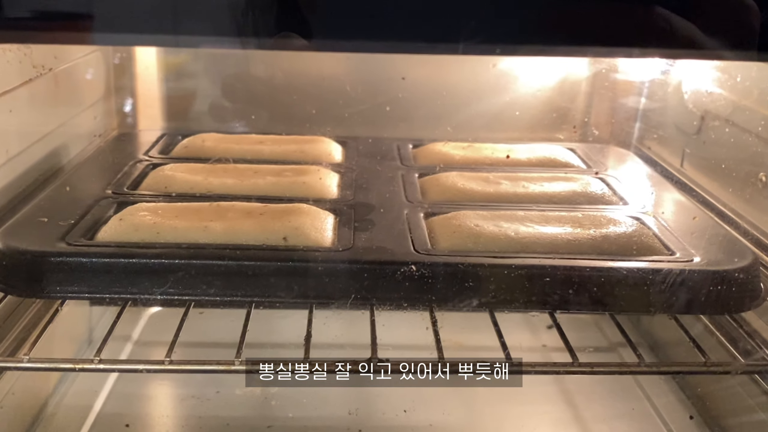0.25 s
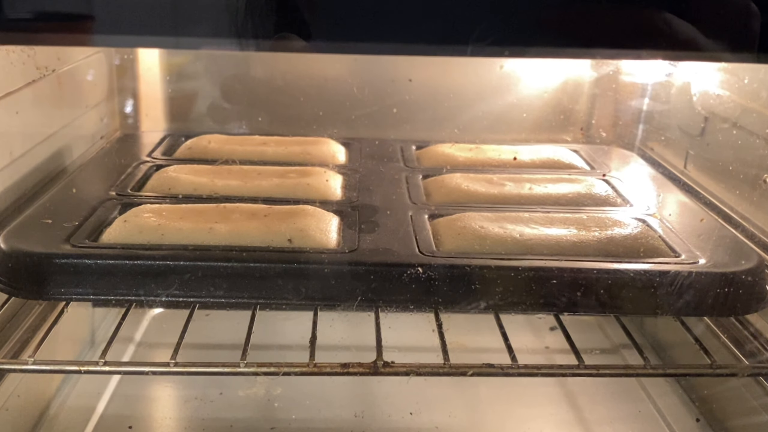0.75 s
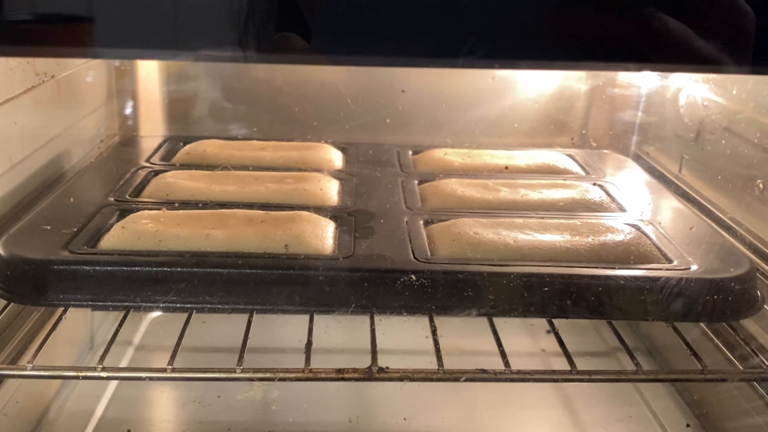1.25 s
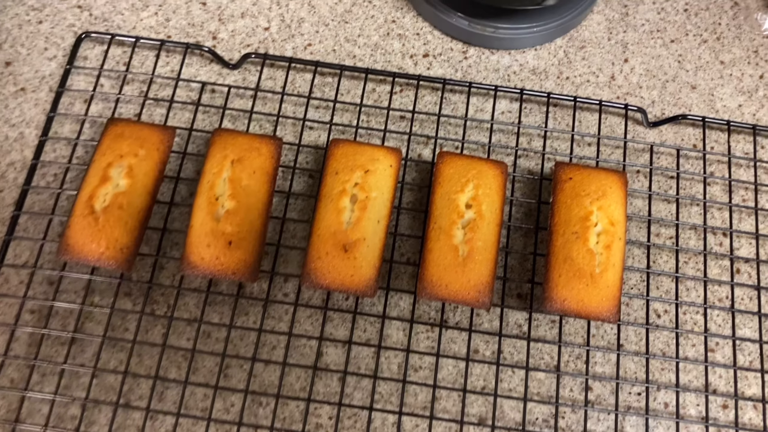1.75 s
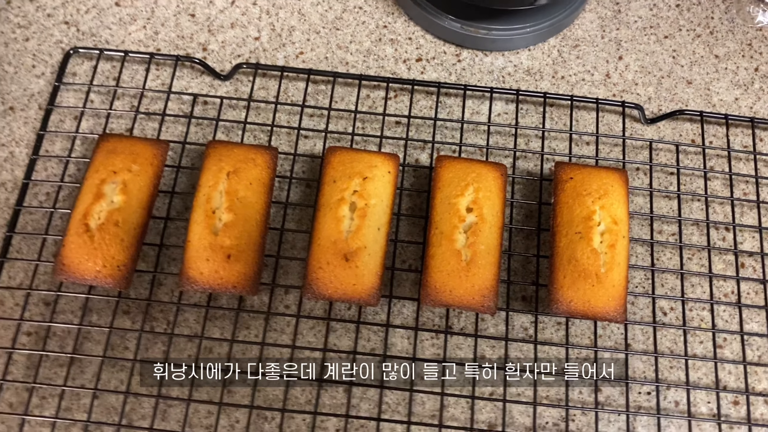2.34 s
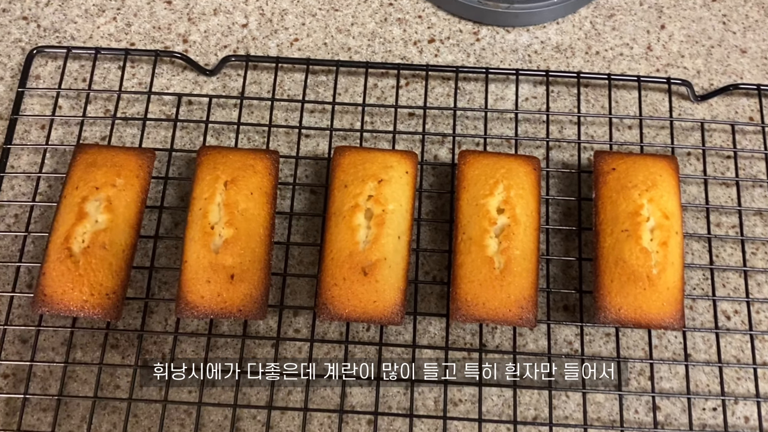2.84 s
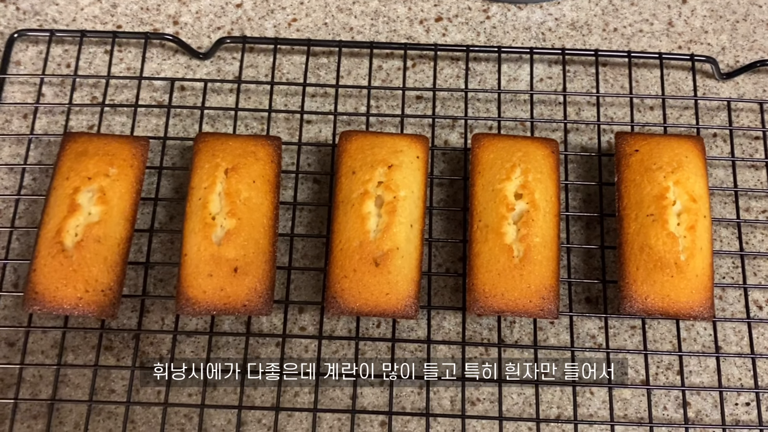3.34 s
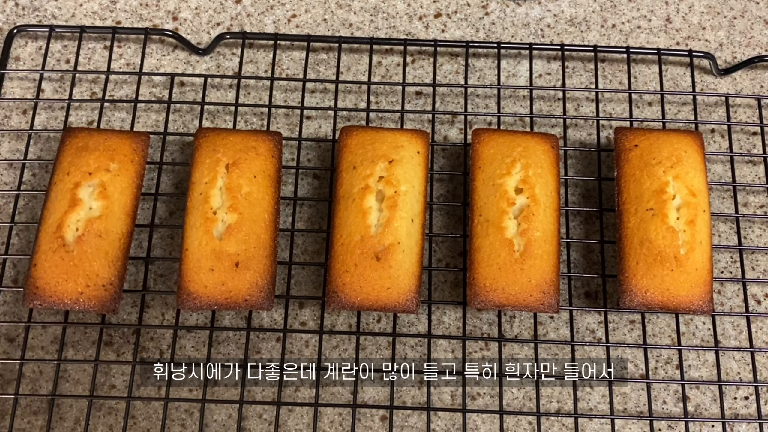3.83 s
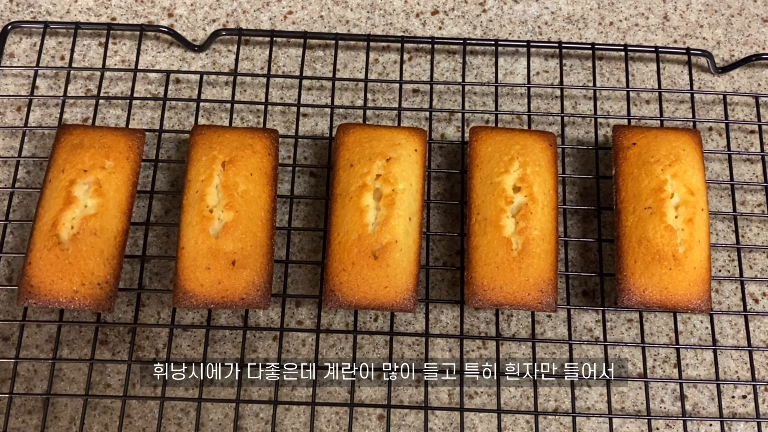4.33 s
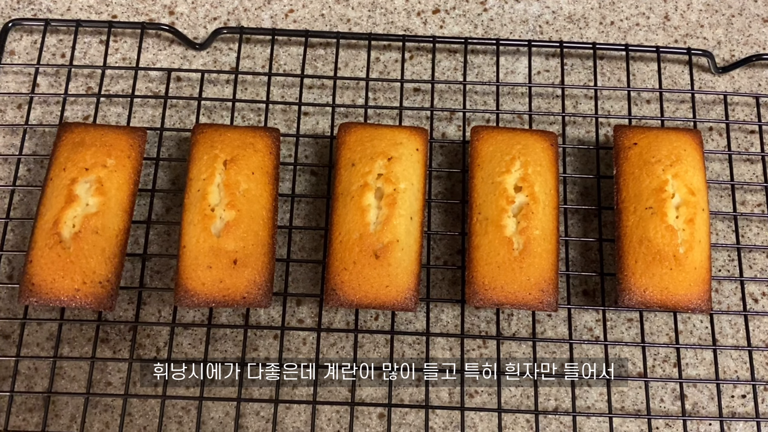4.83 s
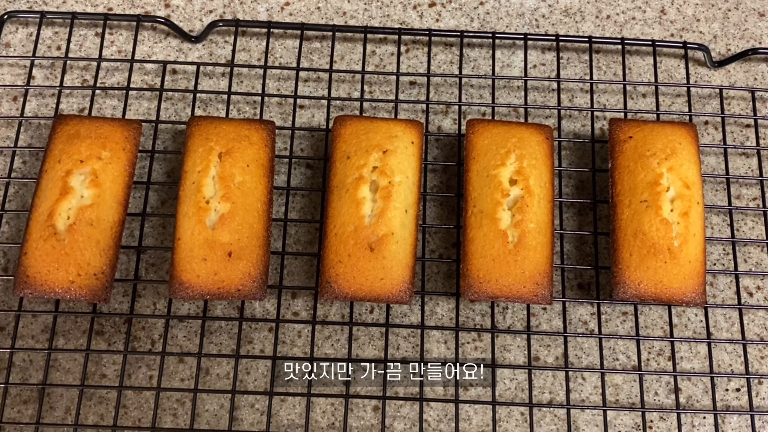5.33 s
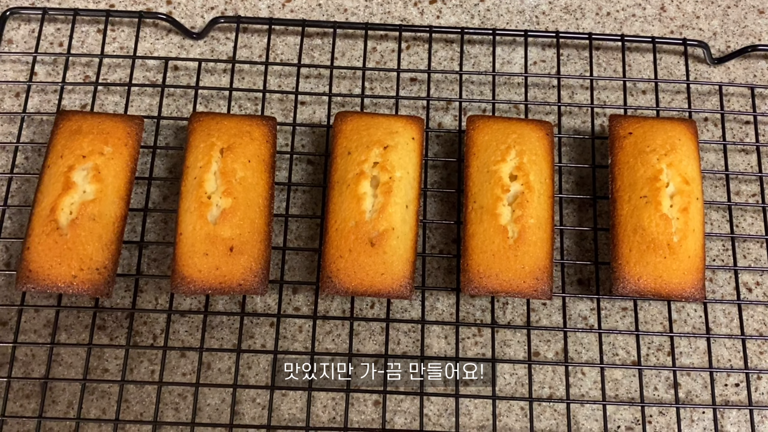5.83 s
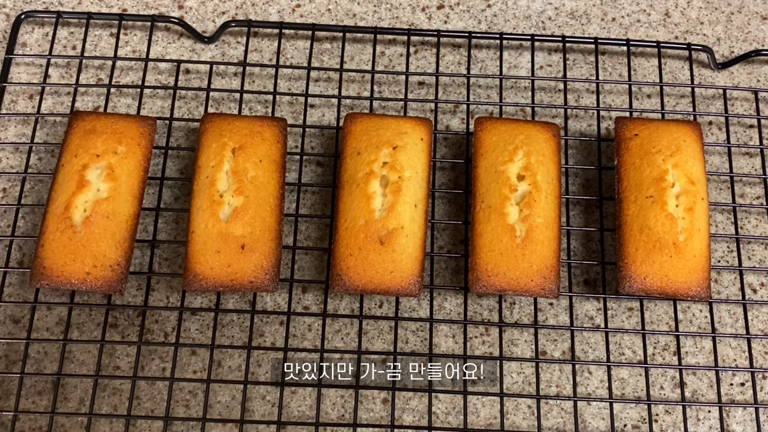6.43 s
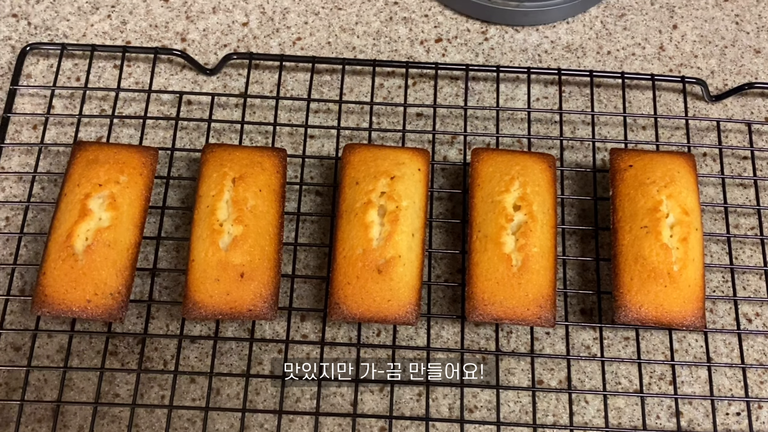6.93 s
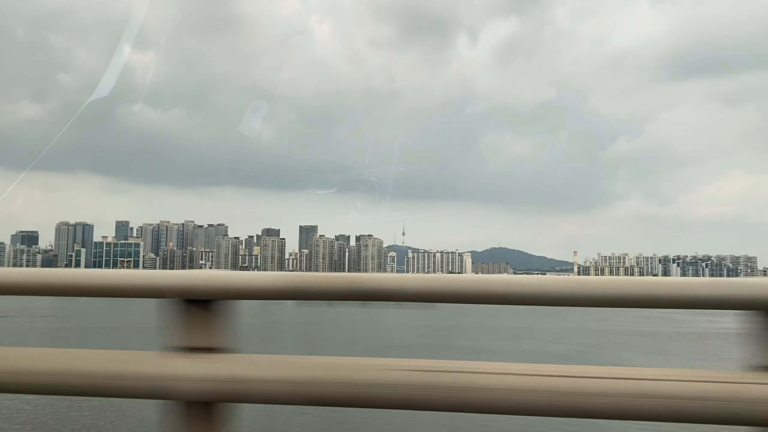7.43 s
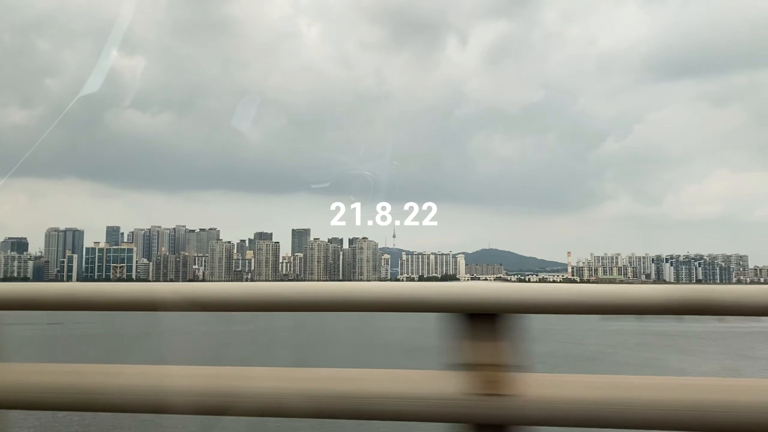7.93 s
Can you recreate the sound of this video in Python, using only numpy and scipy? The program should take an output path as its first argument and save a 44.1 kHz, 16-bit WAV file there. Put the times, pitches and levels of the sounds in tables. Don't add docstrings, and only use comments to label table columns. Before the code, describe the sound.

Faint steady mechanical ticking over low fridge drone, abruptly replaced by booming moving-car cabin noise, with a sharp button press and release near the end.

```python
import sys
import numpy as np
from scipy import signal
from scipy.fft import rfft, irfft, next_fast_len
from scipy.io import wavfile
from scipy.ndimage import uniform_filter1d

SR = 44100
rng = np.random.default_rng(int(sys.argv[2]) if len(sys.argv) > 2 else 0)


def wrap_up_sound(samples):
    columns = np.atleast_2d(samples).T
    tamed = np.clip(columns, -1, 1)
    steps = np.round(tamed * 32767).astype(np.int16)
    wavfile.write(sys.argv[1], SR, steps)


def boost_factor(decibels):
    exponent = np.asarray(decibels, float) / 20
    return 10 ** exponent


N = 360280

# (time [s], strength [dB], snap of the pallet over the frame [dB])
TICKS = [(0.1785, -55, -1.5), (0.4184, -58.5, 6.5), (0.6484, -54.5, 4), (0.8859, -55, 0),
         (1.1164, -54.5, -4.5), (1.3568, -58, 5.5), (1.5768, -59, 1), (1.8073, -55, -0.5),
         (2.0462, -58.5, 2.5), (2.2762, -55.5, -1), (2.5157, -62.5, 6), (2.7475, -56, 3.5),
         (2.9846, -60, 8.5), (3.2151, -56.5, 1.5), (3.454, -59, 6), (3.686, -56.5, 5.5), (3.9235, -59, 6),
         (4.1565, -57, 4), (4.3924, -58, 6), (4.6254, -55.5, 2), (4.8618, -58.5, 7), (5.0953, -57, 4.5),
         (5.3323, -58, 5.5), (5.5648, -56, 4.5), (5.8027, -61, 3), (6.0347, -56.5, 1.5), (6.2731, -57, 3.5),
         (6.5046, -55.5, 4), (6.7436, -60.5, 3.5), (6.9731, -56, 4.5)]
# (lowest [Hz], highest [Hz])
TICK_BANDS = [
    (1250, 1700),
    (1800, 2500),
    (5000, 9000),
    (2800, 5000),
    (9500, 14500),
]
# (lead [s], level at the door [dB], level at the counter [dB])
RELEASES = [
    (.04, -71, -72.5),
    (.048, -61.5, -68.5),
]
# (pitch [Hz], level [dB], time to fall 60 dB [s])
TIMER_MODES = [(1457, 0, .1), (2055, 0, .08), (3010, -8, .05), (3670, -2, .045), (4420, -3, .05),
               (5300, -7, .03), (5700, -8, .03), (6230, -5, .025), (6650, -4, .03), (7000, -8, .03),
               (9200, -8, .015), (10500, -6, .014), (11400, -7, .012), (12900, 2, .012)]
# (case boom [dB], dial plate [dB], top of the crack [dB])
VOICES = [
    [(-22, -4, 4.5), (-10.5, -4, 3)],
    [(-13.5, -4.5, -0.5), (-7.5, -4, 0)],
]
# (time [s], level [dB], centre [Hz], width [Hz], rise [s])
RUSTLES = [(1.19, -76, 1800, 1540, 0.089), (1.543, -72.5, 8900, 8000, 0.027),
           (1.727, -71.5, 8000, 7240, 0.04), (1.929, -76.5, 5000, 8000, 0.027),
           (1.94, -74, 2380, 600, 0.0086), (2.2, -75, 11700, 2500, .04), (2.24, -81, 4000, 1200, 0.015),
           (3.8, -81, 11100, 2500, 0.019), (4.519, -71.5, 10100, 5700, .002),
           (4.816, -67.5, 7140, 8000, 0.0012), (5.014, -71.5, 6700, 6000, .006),
           (6.113, -65, 7450, 5870, 0.0038), (6.79, -82.5, 2520, 2500, 0.064),
           (6.93, -71.5, 5600, 9200, 0.047), (7.07, -73.5, 2760, 2610, 0.013)]
# (time [s], pitch [Hz], level [dB], length [s])
OVEN_HUM = [
    (0.023, 248, -60.5, 0.11),
    (.26, 245, -68, .06),
    (.47, 243, -65, 0.035),
    (0.756, 238, -68, 0.088),
    (.95, 241, -67, 0.027),
    (1.197, 246, -62, 0.077),
    (1.32, 247, -65, 0.053),
]
# (time [s], drone level [dB])
FRIDGE_LOAD = [(0.0, -65), (0.29, -65), (0.69, -66), (1.3, -65.5), (1.53, -68), (1.89, -72), (2.62, -70),
               (2.81, -72.5), (3.11, -75), (3.38, -75), (4.11, -69), (4.29, -64.5), (4.36, -65),
               (5.76, -66.5), (6.51, -65), (7.06, -63)]
# (frequency [Hz], level per Hz [dB])
KITCHEN_AIR = [(15, -37), (25, -9.5), (71, 3.5), (173, -2.5), (246, -5.5), (297, -2), (378, -3.5),
               (666, -8), (1270, -12), (1620, -22), (4380, -38.5), (4870, -37), (6920, -37), (11500, -41.5),
               (15500, -72)]
# (pitch [Hz], width [Hz], level over the air [dB])
FRIDGE_MODES = [
    [(301, 53, 5), (353, 8, 3.5), (698, 25, 6)],
    [(91, 20, 3), (301.5, 7.7, 10.5), (363, 14, 6)],
]
# (time [s], rumble gain [dB], length [s])
STEPS = [
    (1.483, 5, .04),
    (2.36, 7, .06),
    (3.47, 13.5, .06),
    (4.07, 4, .03),
    (4.32, 1, 0.046),
    (5.45, 3, 0.43),
    (6.498, 3, 0.35),
]
# (frequency [Hz], likeness [-1 to 1], left minus right [dB])
KITCHEN_PORTS = [(59.7, 1, 1.5), (129.4, 0.9, -0.3), (249, 0.98, 4), (427, .2, 4), (870, -0.57, 3.5),
                 (1800, 0.22, 1), (5000, 0.31, -1), (12000, -0.34, 0)]
# (frequency [Hz], likeness [-1 to 1], left minus right [dB])
CABIN_PORTS = [(60, 0.97, -0.5), (130, 0.99, -0.5), (250, 0.73, -6.5), (450, 0.28, 1.5), (900, -0.095, 0.5),
               (2000, 0.21, 1), (8000, 0, -2.5), (12000, 1, 1)]
# (frequency [Hz], level per Hz [dB])
CABIN_AIR = [(15, -41.5), (25, -12), (108, 1.5), (226, -11.5), (285, -21), (359, -17.5), (398, -25),
             (452, -19.5), (599, -29), (1260, -32.5), (1360, -36.5), (5420, -71.5), (7960, -72.5),
             (9050, -81.5), (11400, -88.5), (14800, -119), (22000, -120)]
# (pitch [Hz], width [Hz], level over the air [dB])
CABIN_MODES = [(93.8, 120, 0.5), (227.5, 22, 6.5), (361.4, 18, 6.5), (429, 6.4, 9), (1260, 20, 3),
               (2160, 1400, 2.5), (4050, 440, 5.5), (6800, 1500, 4), (12100, 350, 18)]
# (time [s], body boom gain [dB], floor gain [dB], length [s])
JOINTS = [
    (7.13, 10.5, 5, 0.042),
    (7.34, 6, 4.5, .03),
    (7.468, 4.5, 2, 0.024),
    (7.586, 5.5, 4.5, 0.052),
    (7.725, 2.5, 1, 0.028),
    (7.856, 11.5, 0, 0.034),
    (8.007, 6.5, 5, 0.051),
    (8.11, 5.5, 1.5, 0.042),
]
# (pitch [Hz], level [dB])
WHINE = [(11886, -103), (12112, -103)]
# (pitch [Hz], level [dB], time to fall 60 dB [s])
PRESS_MODES = [(14100, -6, .03), (13100, -17, .015), (9300, -19, .008), (7600, -22, .01), (5900, -20, .01),
               (4300, -24, .04), (3100, -26, .03), (2200, -20, .03), (825, -25, .06)]
# (pitch [Hz], level [dB], time to fall 60 dB [s])
LET_GO_MODES = [(13500, -10, .005), (12500, -5, .006), (13500, -20, .02), (12400, -22, .03),
                (8200, -20, .02), (7300, -12, .006), (4200, -25, .02), (2600, -31, .02)]
PRESS_LAG = [.0005, .0002, 0, 0, 0, .001, .001, .001, .002]
LET_GO_LAG = [.0004, .0004, .001, .003, .001, 0, 0, .0003]
# (frequency [Hz], level [dB])
DESK = [(2500, -17), (3000, -11), (4500, -13), (5400, -20), (5900, -12), (6900, -3), (8600, -4),
        (9600, -12), (10300, -8), (11200, -13), (12500, -3), (14300, -2), (15000, -9), (15600, -30)]

COUNTER_S, CUT_S = 1.54, 7.125
TOUCH_S, TOUCH_DB = .0165, -8.5
TOUCH_TOP_DB = (2, 5)
TOP_PER_SNAP = 0.33
DOOR_DULL = 0.53
RUSTLE_T60_S, T60_PER_RISE = 0.28, 5
DRONE_DB, RUMBLE_DB, MURMUR_DB, HISS_DB, FULL_LOAD_DB = 1.35, -65.5, -74, -80.5, -64.5
RUMBLE_PER_DB, MURMUR_PER_DB = 1.2, 0.5
BOOM_DB, FLOOR_DB, ROAR_DB = -27, -30, -39
FLOOR_LAG_S, ROAR_PER_DB = 0.013, 0.14
PRESS_S, LET_GO_S, SEAT_S = 7.8962, 8.0249, (.0042, .0046)


def table(rows, hz, column=1):
    rows = np.array(rows, float)
    return np.interp(np.log(np.maximum(hz, 1)), np.log(rows[:, 0]), rows[:, column])


def add(out, sound, s):
    i = int(s * SR)
    out[..., i:i + sound.shape[-1]] += sound[..., :out.shape[-1] - i]


def unit(x):
    return x / np.sqrt(np.mean(x ** 2))


def band(x, lo_hz, hi_hz):
    edges = [max(lo_hz, 50), min(hi_hz, 17000)]
    return signal.sosfilt(signal.butter(2, edges, "band", fs=SR, output="sos"), x)


def cut_top(x, top_hz):
    return signal.sosfilt(signal.ellip(8, .3, 40, top_hz, fs=SR, output="sos"), x)


def walk(size, rate):
    k = int(SR / rate)
    held = np.repeat(rng.standard_normal(size // k + 1), k)
    return uniform_filter1d(uniform_filter1d(held, k), k)[:size]


def swells(t, s, size, length):
    return sum(a * np.exp(-((t - c) / w) ** 2) for c, a, w in zip(s, size, length))


def ring(modes, size, lag=0):
    hz, db, t60 = np.array(modes, float).T[:, :, None]
    t = np.maximum(np.arange(size) / SR - np.reshape(lag, (-1, 1)), 0)
    return boost_factor(db - 60 * t / t60) * np.sin(2 * np.pi * hz * t)


def air(size, colour, modes, ports, groups, flicker_db):
    hz = np.arange(size // 2 + 1) * SR / size
    bumps = sum(db / (1 + (2 * (hz - f) / width) ** 2) for f, width, db in modes)
    like = np.clip(table(ports, hz), -1, 1)
    tilt = boost_factor(table(ports, hz, column=2) / 2)
    noise = rfft(rng.standard_normal((2, size)))
    mid, side = noise * boost_factor(table(colour, hz) + bumps) * np.sqrt([1 + like, 1 - like])
    pair = np.array([(mid + side) * tilt, (mid - side) / tilt])
    out = 0
    for lo, hi, level_db, full in groups:
        edges = np.geomspace(lo, hi, int(3 * np.log2(hi / lo)) + 1)
        part = 0
        for a, b in zip(edges, edges[1:]):
            part = part + boost_factor(flicker_db * walk(size, 9)) * irfft(pair * ((hz >= a) & (hz < b)), size)
        gauge = irfft(rfft(part.mean(0)) * (hz < full))
        out = out + boost_factor(level_db) * part / np.sqrt(np.mean(gauge ** 2))
    return out


def oven_hum():
    s, hz, db, length = np.transpose(OVEN_HUM)
    t = np.arange(int(COUNTER_S * SR)) / SR
    phase = 2 * np.pi * np.cumsum(np.interp(t, s, hz)) / SR
    tone = swells(t, s, boost_factor(db + 2.5), length) * np.sin(phase)
    return tone * boost_factor([[1.4], [-1.4]])


def blow(levels_db, tail_db=-16, tail_t60=.27):
    size = int(.14 * SR)
    t = np.arange(size) / SR
    chance = rng.standard_normal((len(TIMER_MODES), 2))
    varied = [(f * (1 + 0.017 * a), db + 4 * b, t60) for (f, db, t60), (a, b) in zip(TIMER_MODES, chance)]
    chatter = rng.standard_normal(size) ** 2 * rng.standard_normal(size) * boost_factor(-60 * t / .03)
    struck = signal.fftconvolve(ring(varied, size).sum(0), chatter)[:size]
    noise = rng.standard_normal((3, size))
    out = np.zeros((3, size))
    ring_shares = (.8, .65, .3, .38, .4)
    lags_s = (.005, .003, 0, .001, 0)
    crack_t60s = (0.14, 0.055, 0.04, 0.17, 0.0028)
    wets_db = (9.5, 3, -0.5, -24.0, -19.0)
    tail_end = np.clip((.05 - t) / 0.015 + 1, 0, 1)
    bands = zip(TICK_BANDS, levels_db, ring_shares, lags_s, crack_t60s, wets_db)
    for (lo, hi), db, share, lag, t60, wet_db in bands:
        rung = band(struck, lo, hi)
        crack = band(noise[0] * boost_factor(-60 * t / t60), lo, hi)
        direct = share * rung / abs(rung).max() + (1 - share) * crack / abs(crack).max()
        grain = boost_factor(4 * walk(size, 300))
        fade = boost_factor(tail_db + wet_db - 60 * t / tail_t60) * np.minimum(t / 0.00074, 1)
        tail = unit(band(noise[1:], lo, hi)) * grain * fade
        add(out, boost_factor(db) * np.vstack([direct / abs(direct).max(), tail * tail_end]), lag)
    return out


def timer(cancel_db=10.0):
    out = np.zeros((3, N))
    light_db = np.array([-18.5, -16, -18, -8.0, -9])
    for k, (s, db, snap) in enumerate(TICKS):
        at_counter = int(s > COUNTER_S)
        tock = (k + at_counter) % 2
        case, dial, top = VOICES[at_counter][tock]
        top_db = top + TOP_PER_SNAP * snap + cancel_db
        add(out, blow(db + np.array([case, dial, snap, 0, top_db])), s - .0005)
        add(out, blow(RELEASES[tock][1 + at_counter] + light_db), s - RELEASES[tock][0])
        if not tock:
            touch_db = db + TOUCH_DB + light_db + [0, 0, 0, 0, TOUCH_TOP_DB[at_counter]]
            add(out, blow(touch_db), s - TOUCH_S)
    return out


def rustles(grain_db=2.0):
    out = np.zeros((3, N))
    t = np.arange(int(.4 * SR)) / SR
    for s, db, hz, width, rise in RUSTLES:
        t60 = RUSTLE_T60_S + T60_PER_RISE * rise
        grains = rng.standard_normal((3, len(t))) * boost_factor(grain_db * walk(len(t), 210))
        shape = np.minimum(t / rise, 1) * boost_factor(db - 60 * np.maximum(t - rise, 0) / t60)
        add(out, unit(band(grains, hz - width / 2, hz + width / 2)) * shape * [[1], [.45], [.45]], s)
    return out


def two_ports(x, direct_db=2.5):
    hz = np.arange(N // 2 + 1) * SR / N
    lag_s = 3.3e-5
    right = irfft(rfft(x) * np.exp(-2j * np.pi * hz * lag_s), N)
    return boost_factor(direct_db) * np.array([x, right])


def fridge_and_air(t0, t1, modes):
    s, load_db = np.transpose(FRIDGE_LOAD)
    size = next_fast_len(int((t1 - t0 + .02) * SR / 2)) * 2
    t = t0 + np.arange(size) / SR
    slack = np.interp(t, s, load_db) - FULL_LOAD_DB
    rumble_db = RUMBLE_DB + RUMBLE_PER_DB * slack + swells(t, *np.transpose(STEPS))
    drone_db = DRONE_DB + FULL_LOAD_DB + slack
    murmur_db = MURMUR_DB + MURMUR_PER_DB * slack
    groups = [(25.8, 170, rumble_db, SR), (165.5, 600, drone_db, SR),
              (600, 1200, murmur_db, SR), (1200, 15500, HISS_DB, SR)]
    splice = np.sqrt(np.clip(np.minimum(t - t0 + (t0 == 0), t1 + .01 - t) / .01, 0, 1))
    return splice * air(size, KITCHEN_AIR, modes, KITCHEN_PORTS, groups, flicker_db=1.98)


def kitchen():
    near = timer() + rustles()
    at_door = np.arange(N) < COUNTER_S * SR
    near = near - DOOR_DULL * at_door * band(near, 11800, 14000)
    out = np.zeros((2, N))
    add(out, oven_hum(), 0)
    for modes, t0, t1 in zip(FRIDGE_MODES, (0, COUNTER_S), (COUNTER_S, CUT_S)):
        add(out, fridge_and_air(t0, t1, modes), t0)
    heard = cut_top(out + near[1:], 13400) + cut_top(two_ports(near[0]), 14400)
    dip = .55 * signal.lfilter(*signal.iirpeak(4850, 10, SR), heard)
    return (heard - dip)[:, :int(CUT_S * SR)]


def car(first=-0.048):
    length_n = N - int(CUT_S * SR)
    size = length_n // 2 * 2 + 2
    t = np.arange(size) / SR
    s, boom, drum, length = np.transpose(JOINTS)
    boom_db = BOOM_DB + swells(t + CUT_S, s, boom, length)
    drumming = swells(t + CUT_S - FLOOR_LAG_S, s, drum, length)
    floor_db = FLOOR_DB + drumming
    roar_db = ROAR_DB + ROAR_PER_DB * drumming
    groups = [(18.5, 135, boom_db, SR), (133.0, 300, floor_db, SR), (292.2, 16000, roar_db, 790)]
    out = air(size, CABIN_AIR, CABIN_MODES, CABIN_PORTS, groups, flicker_db=1.0)
    out += (first - out[:, :1]) * np.exp(-t / 0.0043)
    whine = sum(boost_factor(db + 9 + 5 * walk(size, 60)) * np.sin(2 * np.pi * hz * t) for hz, db in WHINE)
    return (out + whine)[:, :length_n]


def button():
    out = np.zeros(N)
    size = int(.25 * SR)
    t = np.arange(size) / SR
    hz = np.arange(size // 2 + 1) * SR / size
    desk_colour = boost_factor(table(DESK, hz)) * (hz > 2500)
    desk = [unit(irfft(rfft(rng.standard_normal(size)) * desk_colour, size)) for _ in range(3)]
    add(out, desk[0] * boost_factor(-27 + 3500 * (t - .008)) * (t < .008), PRESS_S - .0078)
    add(out, ring(LET_GO_MODES, size).sum(0) * boost_factor(-22), LET_GO_S - .0047)
    hits = zip((PRESS_S, LET_GO_S), (PRESS_MODES, LET_GO_MODES), (PRESS_LAG, LET_GO_LAG),
               SEAT_S, desk[1:], (-39, -40), (.19, .26))
    for s, modes, lag, seat, answer, db, t60 in hits:
        low = np.array(modes)[:, :1] < 5000
        stop = seat * (1 + .6 * low * (s == PRESS_S))
        damped = boost_factor(np.maximum(-12000 * np.maximum(t - stop, 0), -16 - 900 * t))
        shell = (ring(modes, size, lag) * damped).sum(0)
        grit = band(rng.standard_normal(size), 1500, 16000) * boost_factor(-21 - 60 * t / .014)
        desk_tail = answer * boost_factor(db - 60 * t / t60) * np.clip((.115 - t) / .04, 0, 1)
        add(out, shell + grit + desk_tail, s)
    hiss = unit(band(rng.standard_normal(size), 5000, 15500))
    add(out, hiss * boost_factor(-60) * np.clip((.235 - t) / .05, 0, 1), PRESS_S)
    return out


def scene():
    return np.hstack([kitchen(), car()]) + cut_top(button(), 15900)


def roll_off(x):
    return signal.sosfilt(signal.butter(12, 16620, fs=SR, output="sos"), x)


def record(dry):
    return roll_off(dry)


dry = scene()
out = record(dry)
wrap_up_sound(out)
```